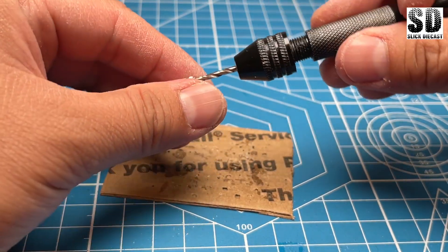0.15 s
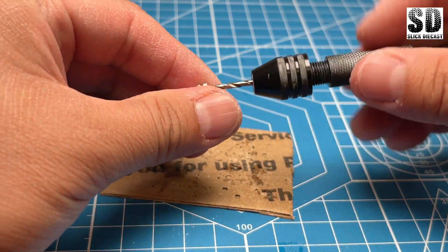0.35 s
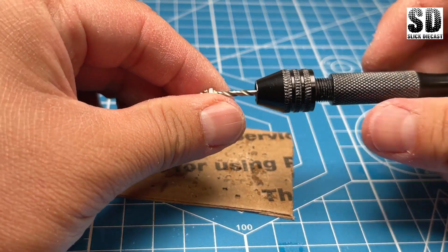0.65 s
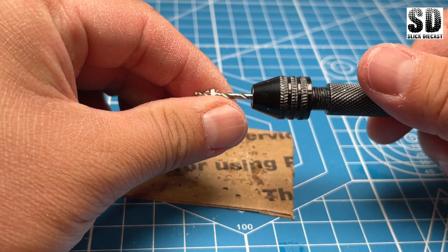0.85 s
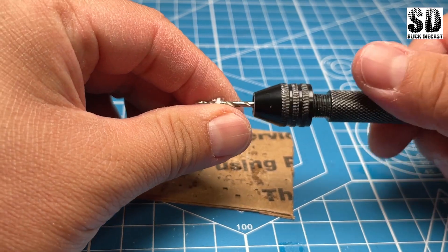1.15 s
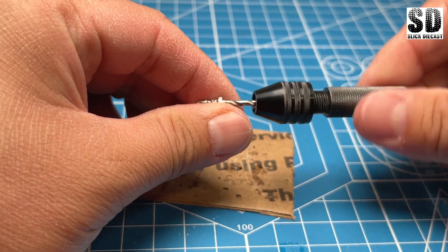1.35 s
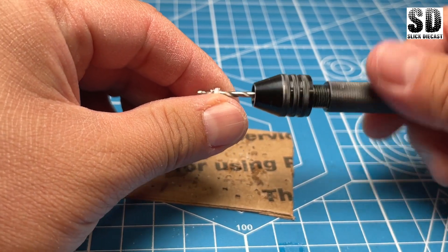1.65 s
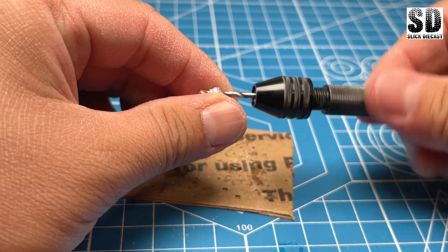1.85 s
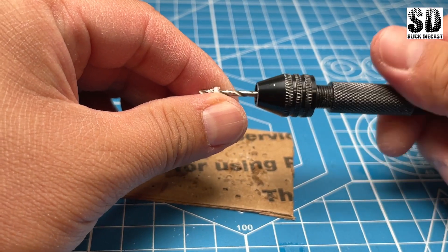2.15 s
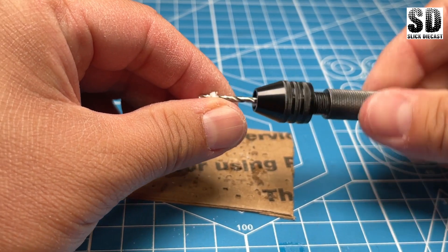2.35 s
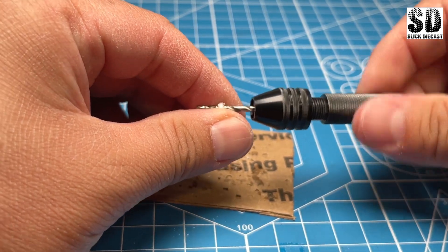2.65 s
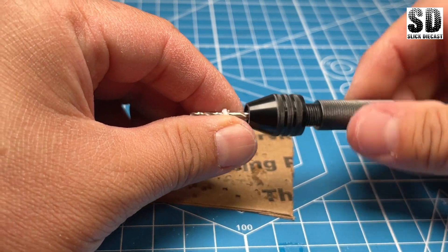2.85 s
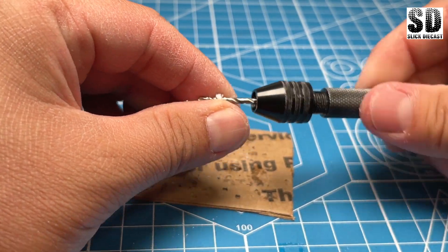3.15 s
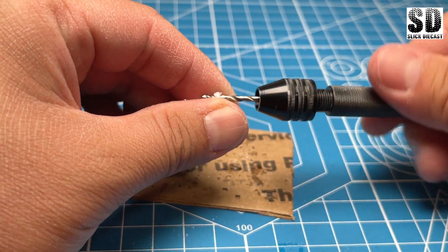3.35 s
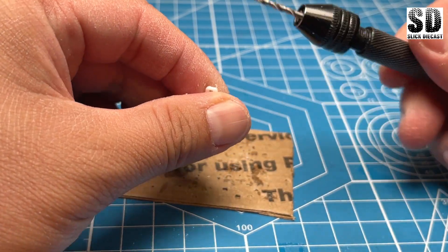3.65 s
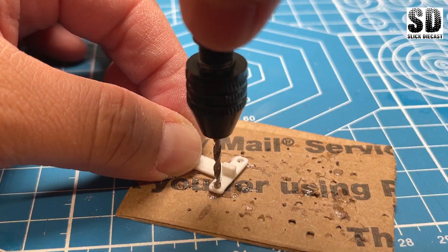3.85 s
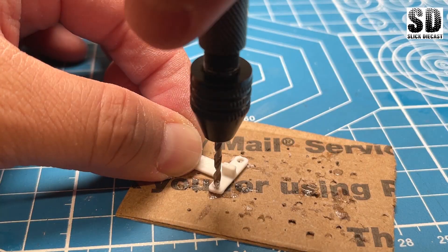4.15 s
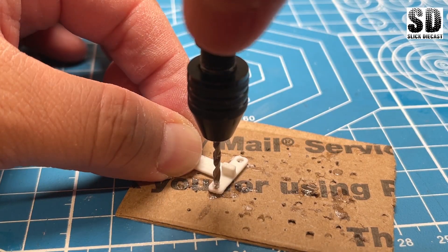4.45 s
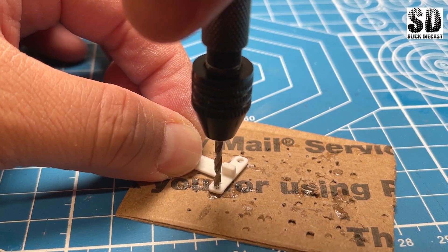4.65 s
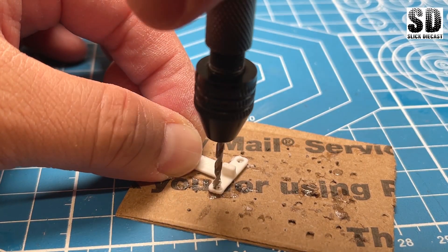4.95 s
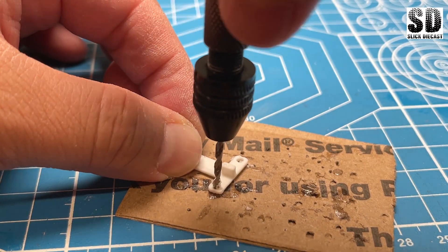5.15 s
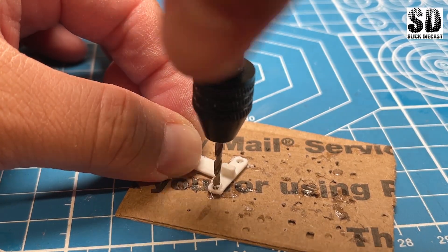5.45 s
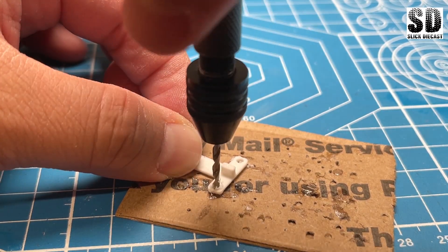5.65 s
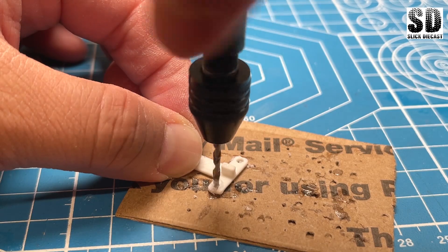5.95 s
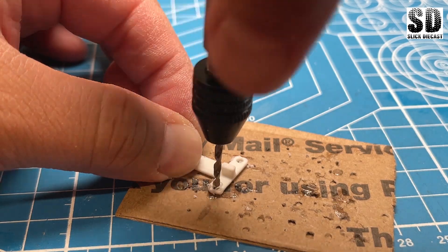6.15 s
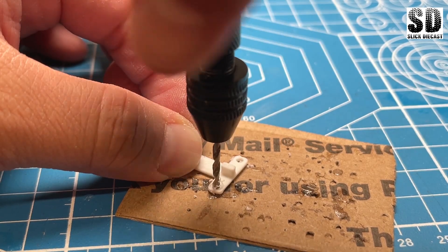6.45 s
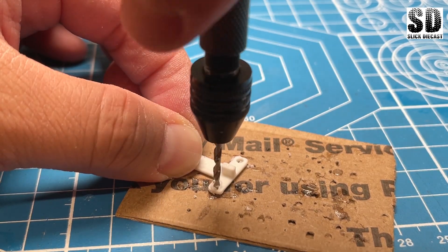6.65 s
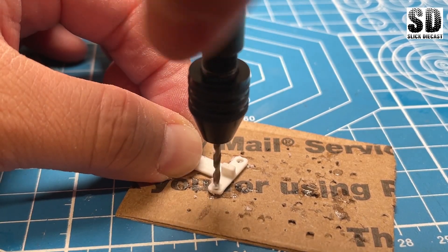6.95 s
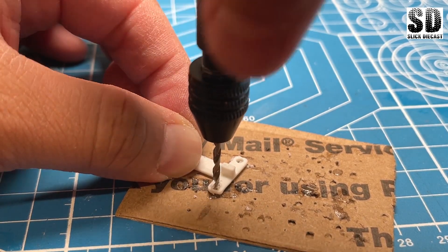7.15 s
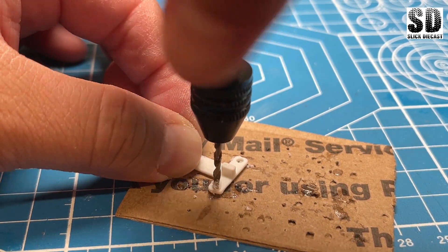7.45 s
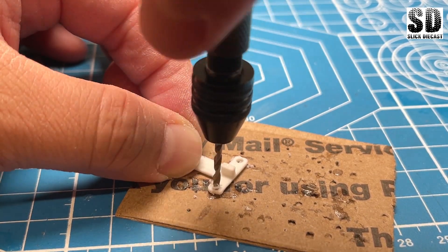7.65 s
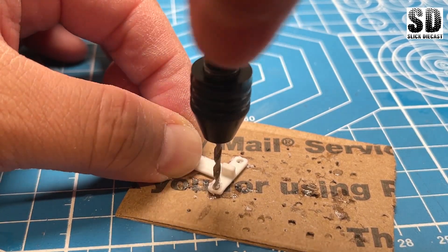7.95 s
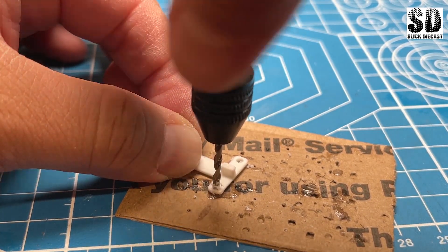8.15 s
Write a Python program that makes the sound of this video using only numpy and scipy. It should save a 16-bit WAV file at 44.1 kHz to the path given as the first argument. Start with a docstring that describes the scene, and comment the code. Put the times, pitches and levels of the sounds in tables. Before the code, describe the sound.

Very close stereo pickup in a quiet room with faint soft hiss and little echo. From 0 to about 3.8 seconds a small hand drill is twirled in a plastic part held in the air: short dry rasps of about a tenth of a second, thin and hissy, with a sharper snap near 0.9 and lesser ones near 2.2 and 2.5. Faint deep hand bumps come near 3.0 and 3.3. Scraping dies away, leaving a short gap with a tiny tick at 3.9. From about 4.1 the part is pressed on card over a bench: brighter gritty scratches, squeaky crackles and muffled low thuds with soft rumble, uneven but steadily repeated. The strokes grow stronger from 6 seconds, with the hardest crisp snaps around 6.4, 6.7, 7.05, 7.35, 7.73 and 8.07, continuing to the end at about 8.3.

```python
"""A hand drill twirled between the fingers: random stick-slip jolts, shaped by twist, hiss and flex the part.
Chips snap as short bursts of edge noise, bit squeak and part flex. The plastic part is first held in the
air, then pressed on card over a bench, where each push adds a thud of decaying modes.
Filtered noise makes rumble and quiet room hiss; sparse echoes and two close microphone ports finish it."""
import sys
import numpy as np
from scipy import signal
from scipy.fft import rfft, irfft, next_fast_len
from scipy.io import wavfile
from scipy.ndimage import uniform_filter1d

SR = 44100
rng = np.random.default_rng(int(sys.argv[2]) if len(sys.argv) > 2 else 0)


def log_audio(samples):
    """Write samples as a 16-bit WAV file to the path given in sys.argv[1]."""
    # one column per channel
    frames = np.atleast_2d(samples).T
    # limit to full scale, then quantise
    limited = np.clip(frames, -1, 1)
    pcm = np.round(limited * 32767).astype(np.int16)
    wavfile.write(sys.argv[1], SR, pcm)


N = 365837

# Twists of the fingers: start_s, length_s, peak_hiss_db (nominal), peak_place (0-1 of length),
# brightness_db (hiss above 7 kHz over hiss below, as gains)
TWISTS = [(0, 0.39, -58.5, 0.1, -2), (0.418, 0.066, -63.5, .55, 9), (.493, 0.11, -58, 0.31, 0.5),
          (0.608, 0.16, -65.5, 0.2, 0.5), (0.819, 0.079, -47, 0.79, -4), (0.875, 0.19, -55.5, 0.14, -10.5),
          (1.166, 0.098, -61.5, 0.48, -6.5), (1.272, 0.094, -58.5, 0.56, -7),
          (1.43, 0.095, -52.5, 0.54, -6), (1.544, 0.094, -62, 0.45, -2), (1.695, 0.077, -54.5, 0.55, -5.5),
          (1.792, 0.085, -64, 0.57, -3), (1.927, 0.062, -53, 0.69, -1), (2.027, 0.083, -65, 0.64, 0),
          (2.161, 0.076, -53, 0.52, -1), (2.256, .11, -60.5, 0.58, -5), (2.441, 0.11, -52.5, 0.67, -6),
          (2.576, 0.084, -58.5, 0.59, -3.5), (2.754, 0.13, -59.5, 0.25, -6.5),
          (2.893, 0.082, -60.5, 0.34, 5), (3.022, 0.13, -64, 0.35, 1), (3.161, 0.094, -57, 0.77, 2),
          (3.326, 0.068, -51, 0.61, -15), (3.427, .14, -60.5, 0.43, -1), (3.572, 0.071, -51.5, 0.58, -13),
          (3.655, .13, -69.5, 0.27, 3), (4.139, 0.12, -53.5, 0.55, 3.5), (4.273, 0.09, -62.5, 0.38, 9),
          (4.479, 0.069, -63.5, 0.02, 19), (4.536, 0.13, -62, 0.17, -1), (4.596, .075, -47.5, 0.56, -2),
          (4.683, 0.049, -67.5, 0.46, -1), (4.75, 0.089, -69.5, 0.3, 6), (4.876, 0.054, -61, 0.42, 11),
          (4.939, 0.13, -49, 0.37, 4.5), (5.11, 0.077, -62, 0.24, 7), (5.227, 0.053, -63.5, 0.73, 5),
          (5.301, 0.1, -58, 0.07, -8), (5.353, 0.069, -44.5, 0.34, 7.5), (5.444, 0.11, -62, 0.48, 8.5),
          (5.621, .16, -49, 0.73, 0), (5.798, 0.088, -61, 0.73, 5), (5.921, 0.05, -76, 0.46, 7),
          (5.975, 0.059, -51, .4, 2), (6.014, 0.083, -40.5, 0.37, 6.5), (6.124, 0.11, -63.5, 0.47, 4),
          (6.272, 0.032, -69.5, 0.57, 8), (6.31, 0.15, -43.5, 0.6, -.5), (6.489, .085, -57.5, 0.47, 6),
          (6.61, 0.054, -70, 0.7, 2.5), (6.672, 0.12, -41.5, 0.34, 12.5), (6.815, 0.082, -58, .2, 3),
          (6.998, 0.1, -42.5, 0.58, 0), (7.081, .14, -54.5, 0.33, 4.5), (7.294, 0.029, -57, 0.6, 10),
          (7.33, .11, -41, 0.28, 3), (7.457, 0.091, -61.5, 0.48, 4.5), (7.65, 0.086, -42.5, 0.98, 7),
          (7.739, .15, -50, 0.12, 4), (7.992, 0.074, -40.5, 0.91, 9), (8.08, 0.13, -49, 0.13, 3.5)]
# Cutting edge, part in the air / on card: pitch_hz, relative_level_db
EDGE_AIR = [(600, -36), (2500, -19), (3800, -4.5), (4700, -2.5), (5600, -4), (6500, -3), (7500, -0.5),
            (9200, 7.5), (11300, 7.5), (12000, -55), (13000, -14)]
EDGE_BENCH = [(500, -53.5), (2500, -27), (3600, -20), (4600, -9.5), (5800, -6.5), (6900, -13), (7900, -9.5),
              (9200, -15.5), (10200, -6), (11350, -12), (12000, -29), (13000, -44.5)]
# Resonances of the part, in the air / on card: pitch_hz, width_hz, relative_level_db
PART_AIR = [(1440, 1300, -6.5), (1970, 1230, 6.5), (2580, 490, -10.5)]
PART_BENCH = [(1064, 350, -8), (2400, 1670, -7), (2903, 820, 7)]
# Thin modes of the bit: pitch_hz, width_hz, relative_level_db
BIT_MODES = [(4910, 79, -1.5), (5900, 330, 8), (6150, 460, -4)]
# Low shaking under the pushes: time_s, bench_top_db, rumble_db
SHAKE = [(0, -69.5, -66.5), (.35, -91, -74), (2, -85.5, -69.5), (2.4, -79, -69), (3.4, -73, -63.5),
         (4.1, -90, -75), (4.3, -85, -72), (5.9, -74.5, -67), (7, -68.5, -68), (7.3, -71.5, -72.5),
         (8.3, -74, -78.5)]
# Pushes into the bench: start_s, level_db (before mode levels), upper_modes_db (added to level_db)
PUSHES = [(3.903, -53.5, -9), (4.315, -38.5, -35), (4.355, -42, -26), (4.453, -44.5, -23), (4.76, -61, -23),
          (4.792, -45.5, -38), (4.902, -44.5, -11), (4.998, -44.5, -13), (5.121, -42, -32),
          (5.152, -42, -37), (5.266, -47, -9), (5.334, -49.5, -3), (5.495, -43.5, -22), (5.565, -45.5, -19),
          (5.612, -50, -27), (5.71, -63, 1), (5.738, -60, 7.5), (5.778, -61.5, 10.5), (5.848, -39, -28),
          (5.885, -44, -25), (6.056, -43, 4), (6.161, -61, -25), (6.194, -37.5, -39), (6.299, -47, -14),
          (6.386, -55, 7.5), (6.437, -55.5, 10), (6.525, -30.5, -38), (6.65, -45.5, -13), (6.72, -37, 8),
          (6.745, -53, 14), (6.844, -38, -9), (6.97, -49.5, -40), (6.997, -48.5, -17), (7.056, -39.5, 9.5),
          (7.183, -42, -3.5), (7.309, -43.5, -12), (7.388, -43, 13), (7.509, -39.5, -34),
          (7.648, -42.5, -6.5), (7.735, -42, 9.5), (7.85, -34.5, -11.5), (7.996, -39.5, -15),
          (8.062, -35, -4.5), (8.185, -39.5, -25)]
# Modes of the bench top, lowest first: pitch_hz, level_db (added to the push), t60_s
BENCH_MODES = [(253.3, 10.5, 0.044), (391, 9, 0.029), (607, -3.5, 0.04), (1021, -8.5, 0.026)]
# Deep bumps of the hands: start_s, level_db, pitch_hz
BUMPS = [(2.989, -43.5, 49), (3.34, -53.5, 60), (4.311, -50, 60.5)]
# Room hiss spectrum: pitch_hz, relative_level_db
ROOM = [(18, -40), (30, -10), (118, -8.5), (234, -20), (646, -24.5), (1220, -37), (4120, -36.5),
        (7570, -33), (11400, -34.5), (12900, -67.5), (16800, -91), (22000, -120)]
# Loudest chips snapping: peak_s, level_db (before the crack/squeak split), squeak_hz,
# flex_db (added to level_db), length_ms (before SNAP_RISE, SNAP_FALL), squeak_share (0-1, nominal)
SNAPS = [(0.4342, -56, 9150, -34, 1.3, .72), (0.4432, -46, 9050, -36, 1.1, 0.87),
         (0.535, -46, 11900, -24, 1.6, 0.65), (.553, -50, 8720, -27, 1.68, .33),
         (0.865, -27, 10830, -10.5, 1.4, .69), (0.875, -35.5, 7100, -1.5, 3.5, 0.49),
         (0.8894, -45, 7390, 1.5, 1.4, 0.3), (1.2114, -60, 3870, 12, 1.9, 0.8),
         (1.278, -49, 4160, -4, 0.67, 0.1), (1.336, -48, 7300, -14, 1.1, 0.42),
         (1.4677, -41, 6830, -6, 4.1, .27), (1.547, -46.5, 4400, -7, 0.67, 0.77),
         (1.74, -56.5, 4010, 3, 17, .28), (1.818, -52, 8150, -10, .9, 0.6),
         (2.0646, -41, 9450, -15, 1, 0.8), (2.195, -34, 8700, -18.5, 1.7, 0.48),
         (2.2438, -52.5, 5670, -25, 2.4, .65), (2.501, -30.5, 5600, -11.5, 3.4, .55),
         (2.782, -50.5, 5600, 4, 0.64, 0.2), (2.8032, -52, 5600, -0.5, 1.3, 0.8),
         (2.9648, -48, 9060, -36, 1.4, 0.88), (3.0676, -38, 9100, -15.5, 1.44, 0.4),
         (3.214, -54, 9000, -21, 2, 0.6), (3.108, -69, 4200, 2, 1.5, .3),
         (3.35, -47.5, 11470, -7.5, 6.7, 0.57), (3.593, -57.5, 10800, 1.5, 8.4, 0.8),
         (3.842, -61, 10660, -19, 2.6, .36), (4.1682, -48.5, 5250, -8, 7.8, 0.6),
         (4.18, -47, 5500, -24, 3.7, 0.7), (4.187, -44.5, 5660, -24, 2, .88),
         (4.198, -46, 5500, -12, 2, 0.6), (4.2577, -51, 6200, -27, 0.83, .78),
         (4.2842, -41, 5840, -5, 0.38, 0.8), (4.514, -51, 8300, -20, 0.39, 0.95),
         (4.5397, -52, 5790, -26, 2.3, .46), (4.627, -38.5, 5430, -28, 5.7, .77),
         (4.636, -30.5, 5900, -31, 0.9, 1), (4.9832, -42, 5290, -17, 3.5, .85),
         (4.99, -38, 5570, -26, 2.7, .88), (4.9955, -38, 5940, -39, 3.3, 0.68),
         (5.2274, -50.5, 8400, -12, 0.96, 0.68), (5.3605, -32.5, 5250, -5.5, 2.8, 0.59),
         (5.39, -47, 10920, -30, 3.5, .24), (5.4011, -46, 6600, -10.5, 4.4, .31),
         (5.6038, -50.5, 6010, -7, 0.94, .36), (5.6958, -38.5, 8530, -18, 1, .77),
         (5.704, -37.5, 7800, -11.5, 4.4, 0.5), (5.734, -45.5, 6050, -11, 1.1, 0.9),
         (5.7464, -63, 6100, -21, 1.3, 0.6), (6.0024, -37, 6500, -16, 1.1, 0.87),
         (6.008, -33, 6070, -28, 1.7, 0.93), (6.0344, -37, 5750, -13, 2.5, 0.95),
         (6.0465, -34, 6260, -12, 4.3, 0.52), (6.057, -46, 8160, -16, .9, .46),
         (6.1562, -43.5, 4900, -12.5, 1.1, 0.87), (6.3798, -34.5, 5530, -8.5, 4, 0.7),
         (6.387, -24.5, 7800, -8, 0.95, .73), (6.4072, -25.5, 7860, -37, 0.27, 0.76),
         (6.453, -41.5, 5500, -5.5, 1, 0.8), (6.4853, -53.5, 5040, 4, 0.93, 0.6),
         (6.6743, -42.5, 6060, -34.5, 5, 0.55), (6.6852, -31, 6150, -38, 1.5, 0.88),
         (6.6944, -12.5, 6000, -43.5, 1.27, 0.94), (6.7037, -21, 5480, -28, 1.6, .88),
         (6.712, -22, 7950, -12, 0.7, 0.8), (6.7155, -20.5, 6050, -4, 0.49, 0.26),
         (6.7347, -38.5, 5240, 3.5, 4.5, 0.52), (6.7608, -49, 10960, 5.5, 2.8, 0.3),
         (6.823, -30.5, 6430, -22, 0.61, 0.55), (6.834, -44.5, 4940, -22, 1.1, 0.9),
         (6.9911, -56, 8420, -22, 1.2, .66), (7.0106, -40, 6170, -22.5, 1.9, .84),
         (7.038, -35.5, 6070, -21, 5.8, 0.4), (7.047, -14, 5460, -22, 0.73, 0.65),
         (7.0519, -17.5, 5760, -16, 2.9, 0.59), (7.057, -13.5, 5700, -13, 0.26, 0.9),
         (7.06, -19.5, 6060, -26.5, 1.2, .43), (7.0642, -26, 4650, -6, 4.1, .34),
         (7.0717, -24, 6370, -11, 1.1, 0.73), (7.139, -50, 8030, 11.5, 0.39, .29),
         (7.3431, -22.5, 7540, -41.5, 2.4, 0.58), (7.3542, -22.5, 5880, -39, 2.1, 0.3),
         (7.361, -23, 7500, -45, 6, .46), (7.3835, -23.5, 5250, -11, 3.1, 0.48),
         (7.6372, -60.5, 8000, -15, 2.5, .36), (7.6872, -31.5, 6360, -44, 2.6, .68),
         (7.702, -33.5, 5770, -36.5, 3.1, 0.9), (7.719, -32, 5440, -12.5, 3.6, 0.92),
         (7.7319, -15.5, 5120, -18, 2.3, 0.48), (7.734, -27.5, 5640, 2.5, 1, .34),
         (7.785, -45.5, 5100, 0, 1.4, 0.48), (7.9873, -62, 8230, -16.5, 1.1, .52),
         (8.0295, -40, 6140, -26, 1.04, 1), (8.0427, -37.5, 5420, -28, 3, 0.7),
         (8.05, -25.5, 5640, -16, 2, 0.54), (8.0593, -29, 5490, -18, 3.2, .68),
         (8.0672, -16, 6000, -8, 0.73, 0.7), (8.0708, -22.5, 5470, -12, 2.2, 0.57)]
# Phase between ports: pitch_hz, left_lead_rad
LEAD = [(0, 0), (1550, -.2), (3190, .5), (4740, .6), (7150, -.1), (7920, .6), (8790, -.2), (9300, -1.7),
        (10400, -3.4), (11800, -6.2), (12600, -6.4)]
# Level between ports: pitch_hz, left_minus_right_db
TILT = [(200, 1.5), (450, 0), (700, 2), (1000, 5.5), (1300, 5), (1650, 0), (11500, 0), (12700, -3)]

UPRIGHT_S = 3.88  # pose changes from air to card
SWELL_DB, FADE_DB = 26.5, 21.5  # per twist length, up to and down from the peak
START_S, STOP_S, SILENT_DB = 0.0027, 0.039, -21.5  # edge bites and lets go
CRACKLE_DB = -13.5  # small random chips, re the dense slips
CHATTER_DB = -13
FLEX_AIR_DB, FLEX_BENCH_DB, FLEX_LAW = -20, -20, 0.84  # flex gain; power law on hiss gain
TWIST_TOP_DB, TWIST_RUMBLE_DB, TWIST_LAW = -36.5, -54.5, 0.41  # shake gains; power law on hiss gain
HAND_SHARE = 0.063  # twist shake gain while held in the air
CREAK_DB, CREAK_LAW = -41.5, 1.1  # creak gain; power law on twist shake
AFTER_TOP_DB, AFTER_RUMBLE_DB, AFTER_T60_S = -12, -10, 0.17  # shaking after each push
BUMP_RISE_S = 0.039
ROOM_DB, ROOM_WANDER_DB = -78, 1.5
ECHO_DB, ECHO_T60_S = -19, 0.08
SNAP_RISE, SNAP_FALL = 0.79, 0.94  # multiples of length_ms
TAP_S, TAP_PEAK_DB, TAP_DECAY_S = 3.9045, -46, 0.00012
BAND_LIMIT_HZ = 13000


def amp(db):
    """Decibels to gain."""
    return 10 ** (np.asarray(db) / 20)


def evened(x):
    """Scales to rms 1."""
    return x / np.sqrt(np.mean(x ** 2) + 1e-20)


def smoothed(x, size, axis=-1):
    """Two passes of a moving average."""
    return uniform_filter1d(uniform_filter1d(x, size, axis=axis), size, axis=axis)


def upright():
    """True at the samples where the part is on the card."""
    return np.arange(N) > UPRIGHT_S * SR


def read(points, hz):
    """Interpolates a spectrum on a log-frequency axis."""
    f, value = np.transpose(points)
    return np.interp(np.log(hz + 1), np.log(f + 1), value)


def add(mix, s, sound):
    """Adds a sound into the mix at a time in seconds."""
    part = mix[round(s * SR):][:len(sound)]
    part += sound[:len(part)]


def convolved(x, taps):
    """Filters x, cut to the scene length."""
    return signal.oaconvolve(x, taps)[:N]


def causal(points, size=1024):
    """Minimum-phase impulse response with the given spectrum, energy 1."""
    log_gain = np.log(amp(read(points, abs(np.fft.fftfreq(size, 1 / SR)))))
    spectrum = np.exp(np.conj(signal.hilbert(log_gain)))
    taps = np.fft.ifft(spectrum).real[:size // 2]
    return taps / np.linalg.norm(taps)


def modes(rows, size=1024):
    """Impulse response of soft-starting resonances, energy 1."""
    t = np.arange(size) / SR
    taps = np.zeros(size)
    for hz, width, db in rows:
        envelope = width ** 1.25 * t * np.exp(-np.pi * width * t)
        taps += amp(db) * envelope * np.sin(2 * np.pi * hz * t)
    return taps / np.linalg.norm(taps)


def thin(taps):
    """Held in the air, a part this small radiates little bass."""
    return signal.sosfilt(signal.butter(4, 950, "high", fs=SR, output="sos"), taps)


def posed(x, air, bench):
    """Passes jolts through the body of the pose that holds at each moment."""
    return convolved(x * ~upright(), air) + convolved(x * upright(), bench)


def slips(per_s, spread_db, clump_db):
    """Stick-slip: a random train of tiny jolts that comes in clumps, rms 1."""
    size = amp(spread_db * np.minimum(rng.exponential(1, N), 4))
    size *= rng.random(N) < per_s / SR
    clumps = evened(smoothed(rng.standard_normal(N), 150))
    return evened(size * rng.choice([-1., 1.], N) * amp(clump_db * clumps))


def drifting(x, patchy_db):
    """The colour wanders in patches as the contact between edge and plastic changes."""
    z = signal.stft(x, nperseg=256)[2]
    patches = rng.standard_normal(z.shape)
    patches = uniform_filter1d(patches, size=4, axis=0)
    patches = evened(uniform_filter1d(patches, size=24, axis=1))
    return signal.istft(z * amp(patchy_db * patches), nperseg=256)[1][:N]


def twists():
    """Each twist swells and fades: power of the lower half and of the top of its hiss."""
    dull, bright = np.zeros((2, N))
    for s, length, db, place, bright_db in TWISTS:
        t = np.arange(-min(s, START_S), length + STOP_S, 1 / SR)
        late = t - place * length
        slope_db = np.maximum(-SWELL_DB * late, FADE_DB * late) / length
        ends = np.clip(np.maximum(-t / START_S, (t - length) / STOP_S), 0, 1)
        power = amp(db - slope_db + SILENT_DB * ends) ** 2
        top = 1 / (1 + amp(-bright_db) ** 2)
        add(dull, s + t[0], 2 * power * (1 - top))
        add(bright, s + t[0], 2 * power * top)
    return dull, bright


def bit_chatter(dull):
    """Pressed upright, the bit rings now and then as the edge chatters."""
    jolts = upright() * np.sqrt(dull) * slips(3000, 2, 4)
    return convolved(jolts, modes(BIT_MODES, size=2048))


def part_flex(shared, dull, bright):
    """Edge slips and slips of its own excite the resonances of the part."""
    gain = amp(np.where(upright(), FLEX_BENCH_DB, FLEX_AIR_DB))
    gain = gain * ((dull + bright) / 2) ** (FLEX_LAW / 2)
    jolts = gain * (.4 * shared + .9 * slips(6000, 3, 2.5))
    return drifting(posed(jolts, thin(modes(PART_AIR)), modes(PART_BENCH)), patchy_db=3)


def scrape():
    """Slips hiss at the cutting edge and flex the part; separate slips ring the bit."""
    dull, bright = twists()
    shared = slips(9000, 4.0, 1.9) + amp(CRACKLE_DB) * slips(200, 3.6, 3.1)
    hiss = posed(shared, causal(EDGE_AIR), causal(EDGE_BENCH))
    low = signal.sosfiltfilt(signal.butter(3, 7000, fs=SR, output="sos"), hiss)
    edge = np.sqrt(dull) * low + np.sqrt(bright) * (hiss - low)
    return edge + amp(CHATTER_DB) * bit_chatter(dull) + part_flex(shared, dull, bright)


def bench_modes():
    """Decaying sines of the bench top: the lowest, and the sum of the rest."""
    t = np.arange(6000) / SR
    low, *upper = [amp(db - 60 * t / t60) * np.sin(2 * np.pi * hz * t) for hz, db, t60 in BENCH_MODES]
    return low, sum(upper)


def pushes(low, upper):
    """Each push strikes the bench modes; also returns the gain of the shaking that follows."""
    t = np.arange(6000) / SR
    thuds, after = np.zeros((2, N))
    for s, db, upper_db in PUSHES:
        add(thuds, s, amp(db) * (low + amp(upper_db) * upper) * (1 - np.exp(-t / 0.005)))
        add(after, s, amp(db - 60 * t / AFTER_T60_S) * np.sin(np.pi * t / t[-1]) ** 0.24)
    return thuds, after


def hand_bumps():
    """Deep sines under a smooth rise and fall."""
    out, t = np.zeros(N), np.arange(6000) / SR
    for s, db, hz in BUMPS:
        envelope = (t / BUMP_RISE_S) ** 2 * np.exp(2 - 2 * t / BUMP_RISE_S)
        taper = np.cos(np.pi * t / t[-1] / 2)
        add(out, s, amp(db) * envelope * taper * np.sin(2 * np.pi * hz * t))
    return out


def rumble(gain):
    """Noise through deep resonances, one pair for each pose."""
    air = modes([(61.0, 35, -6.5), (118.5, 33, -8)], size=8192)
    board = modes([(58.3, 5.3, -12.5), (100.6, 51, 0.5)], size=8192)
    return posed(gain * rng.standard_normal(N), air, board)


def bench():
    """Uneven pressure and twists shake and creak the bench top; pushes thud and leave it shaking."""
    low, upper = bench_modes()
    thuds, after = pushes(low, upper)
    s, *columns = np.transpose(SHAKE)
    top, deep = [amp(np.interp(np.arange(N) / SR, s, db)) for db in columns]
    twist = np.where(upright(), 1, HAND_SHARE) * (sum(twists()) / 2) ** (TWIST_LAW / 2)
    body = modes([(240, 130, 0), (390, 150, -13)], size=4096)
    shake = evened(convolved(slips(1500, 1.5, 1.5), body))
    creak = evened(convolved(slips(170, 3.4, 2.8), upper))
    out = thuds + hand_bumps()
    out += (top + amp(AFTER_TOP_DB) * after + amp(TWIST_TOP_DB) * twist) * shake
    out += amp(CREAK_DB) * twist ** CREAK_LAW * creak
    out += rumble(deep + amp(AFTER_RUMBLE_DB) * after + amp(TWIST_RUMBLE_DB) * twist)
    return signal.sosfilt(signal.butter(2, 35, "high", fs=SR, output="sos"), out)


def room_tone():
    """Soft, slowly wavering noise above 200 Hz; the ports share most of its treble."""
    hz = np.fft.rfftfreq(N, 1 / SR)
    shared, left, right, drift = rng.standard_normal((4, N))
    own = rfft(np.array([left, right])) * 1.1 / (1 + (hz / 1500) ** 2)
    tone = irfft((rfft(shared) + own) * amp(read(ROOM, hz)) * (hz > 200), N)
    level_db = ROOM_DB + ROOM_WANDER_DB * evened(smoothed(drift, 3000))
    return amp(level_db) * evened(tone)


def reflections(x):
    """Sparse taps of random sign that die quickly, about half of them flipped at the right port."""
    taps = np.zeros(8000)
    at = np.arange(60, 7980, 20) + rng.integers(0, 20, 396)
    taps[at] = rng.choice([-1., 1.], len(at))
    taps *= amp(-60 * np.arange(8000) / SR / ECHO_T60_S)
    pair = np.array([taps, taps * rng.choice([-1., 1.], len(taps))])
    return amp(ECHO_DB) * signal.oaconvolve(x[None], pair / np.linalg.norm(taps), axes=1)[:, :N]


def snaps():
    """A chip tears off in a short burst of jolts: the edge cracks, the bit squeaks, the part flexes."""
    crack, flex, squeak = np.zeros((3, N))
    t = (np.arange(1200) - 500) / SR
    for s, db, hz, flex_db, length_ms, share in SNAPS:
        chance = rng.standard_normal(1200)
        tone = np.clip((share - .45) / 0.49, 0, 1)
        side_ms = max(length_ms, .3) * np.where(t < 0, SNAP_RISE, SNAP_FALL)
        # about 8 dB down after the rise or fall time
        swell = amp(db - 7.57 * abs(1000 * t / side_ms) ** 0.92)
        jolts = chance * abs(chance) ** 0.76 + 8.0 * (t == 0)  # spiky, one hard break at the peak
        add(crack, s + t[0], .6 * np.sqrt(1 - tone) * swell * jolts)
        add(flex, s + t[0], amp(flex_db) * swell * chance)
        add(squeak, s + t[0], np.sqrt(2 * tone) * swell * np.sin(2 * np.pi * hz * t + chance[0]))
    cracks = posed(crack, causal(EDGE_AIR), causal(EDGE_BENCH))
    return squeak + cracks + posed(flex, thin(modes(PART_AIR)), modes(PART_BENCH))


def tap():
    """One step-like tick, wide in pitch: a sudden jump with a fast exponential decay."""
    out, t = np.zeros(N), np.arange(200) / SR
    add(out, TAP_S, amp(TAP_PEAK_DB) * np.exp(-t / TAP_DECAY_S))
    return out


def scene():
    """Drill, bench and room; the bench sounds from a wide area and stirs more echo."""
    drill = drifting(scrape(), patchy_db=3.0) + snaps() + tap()
    low = bench()
    return drill + low + reflections(drill + 2 * low) + room_tone()


def record(dry):
    """The ports differ in level and phase, out of step near 10 kHz; then the band limit."""
    size = next_fast_len(N + 4096)
    hz = np.fft.rfftfreq(size, 1 / SR)
    half = amp(read(TILT, hz) / 2)
    lead = np.exp(1j * np.interp(hz, *np.transpose(LEAD)))
    ports = np.array([half * lead, 1 / half])
    wet = irfft(rfft(dry, size) * ports, size)[:, :N]
    low_pass = signal.firwin(255, BAND_LIMIT_HZ, window=("kaiser", 7), fs=SR)
    return signal.oaconvolve(wet, low_pass[None], "same")


dry = scene()
out = record(dry)
log_audio(out)
```